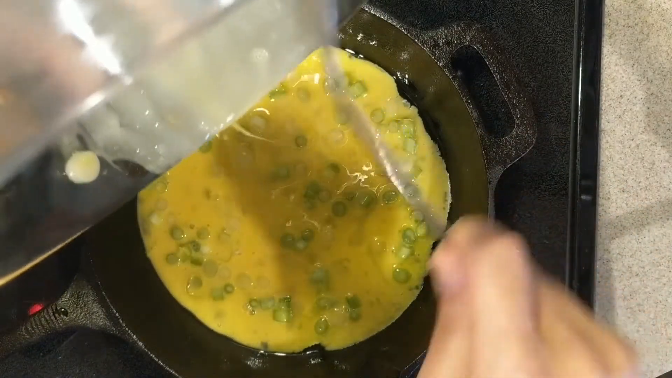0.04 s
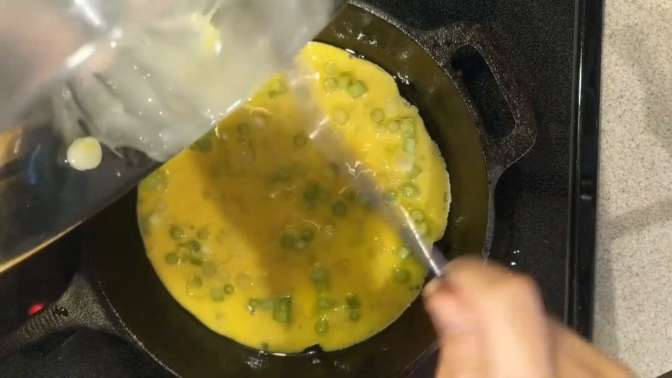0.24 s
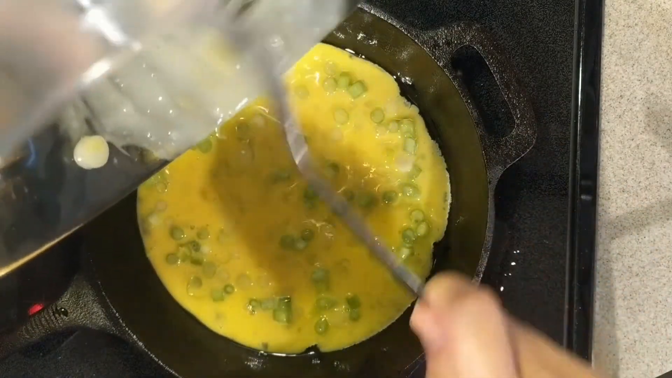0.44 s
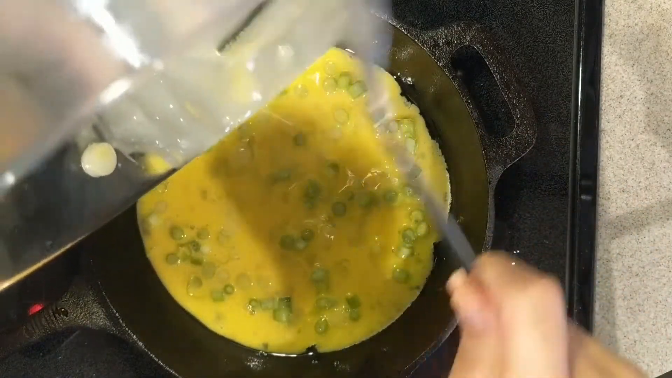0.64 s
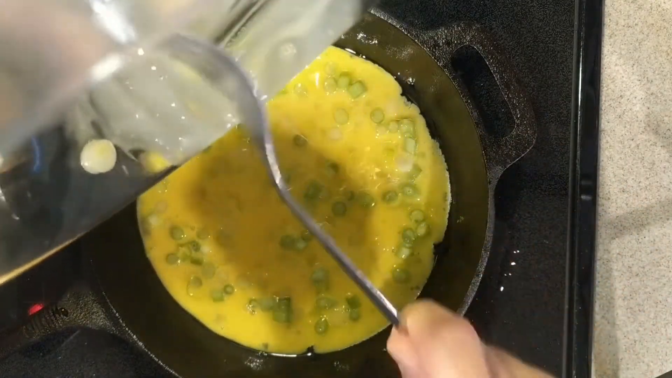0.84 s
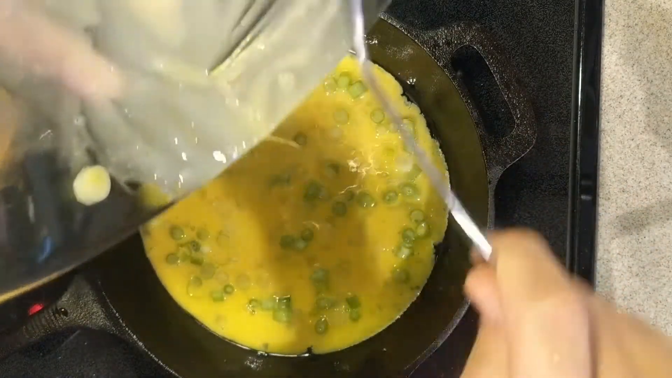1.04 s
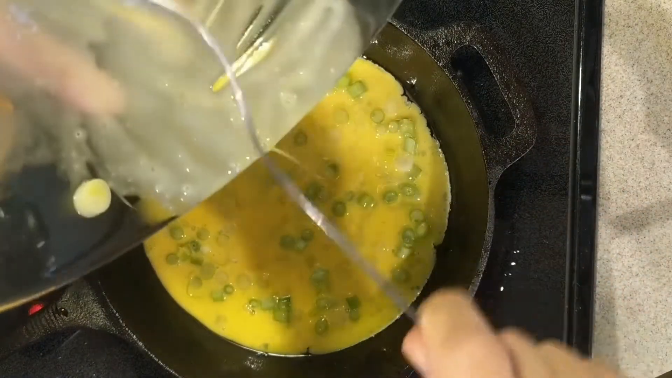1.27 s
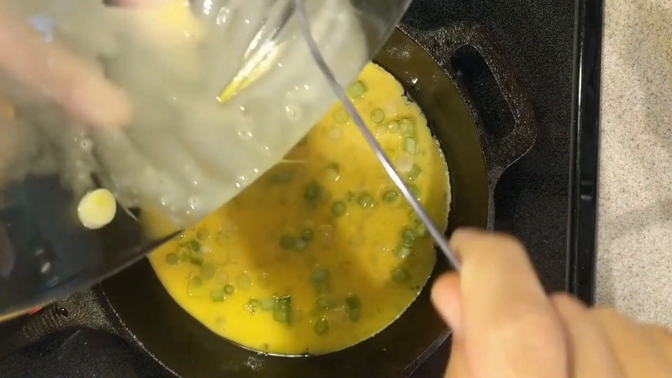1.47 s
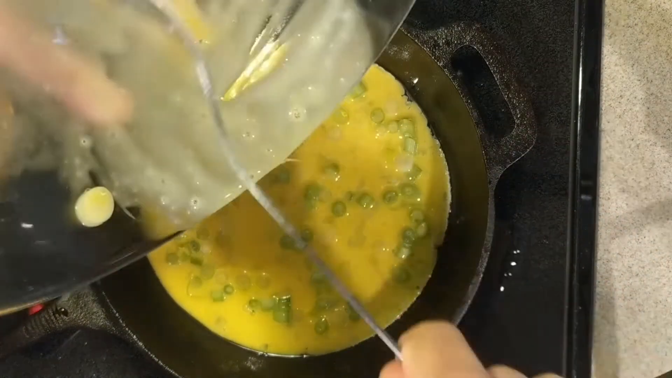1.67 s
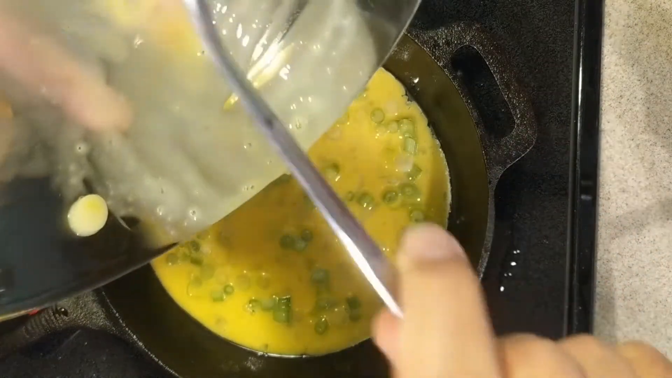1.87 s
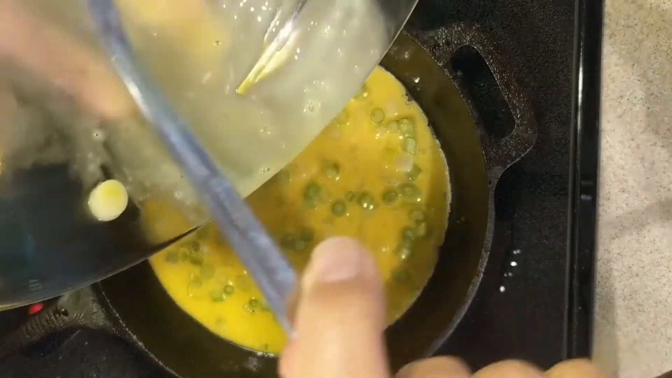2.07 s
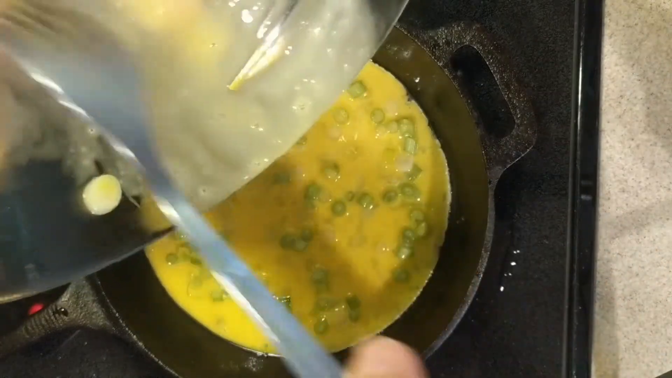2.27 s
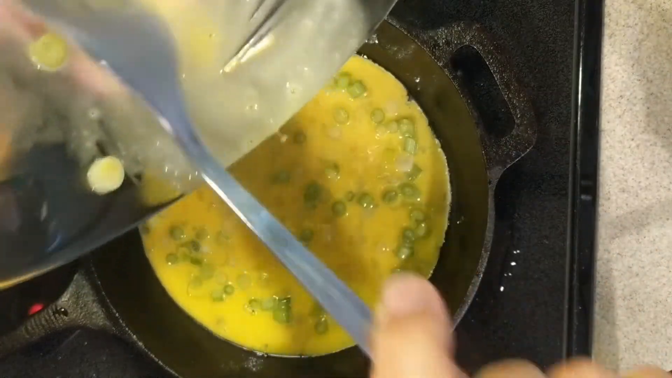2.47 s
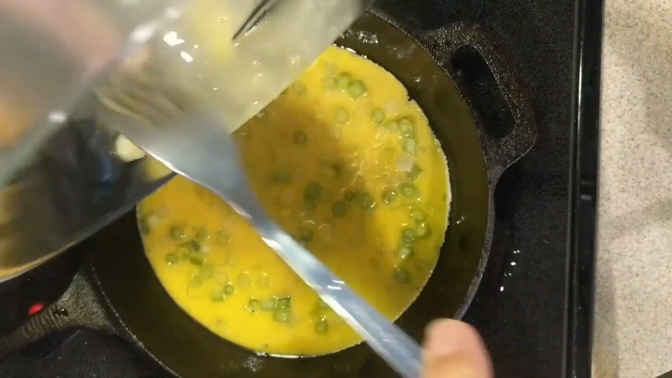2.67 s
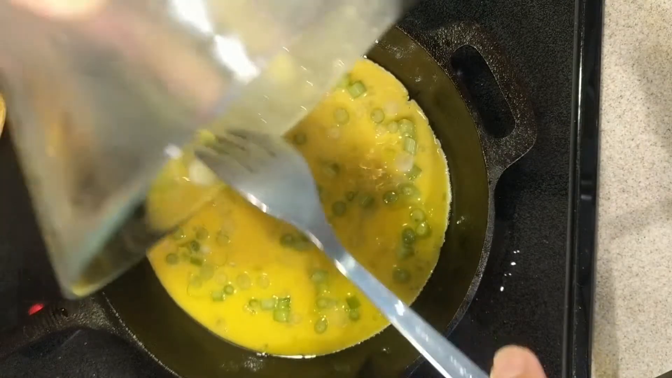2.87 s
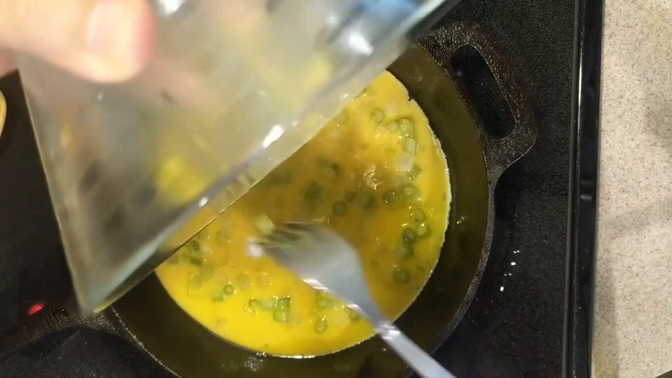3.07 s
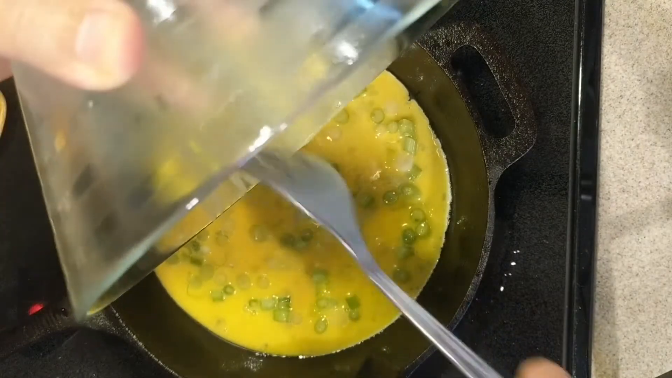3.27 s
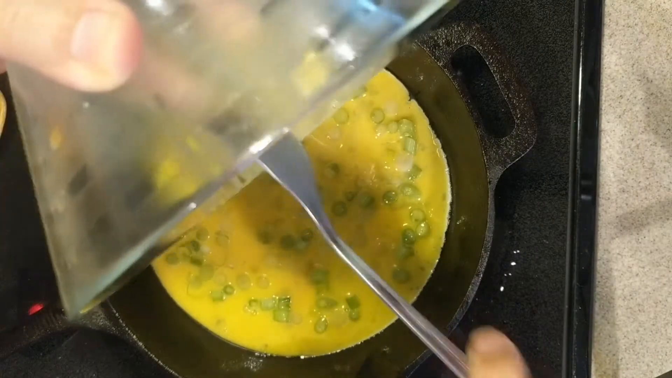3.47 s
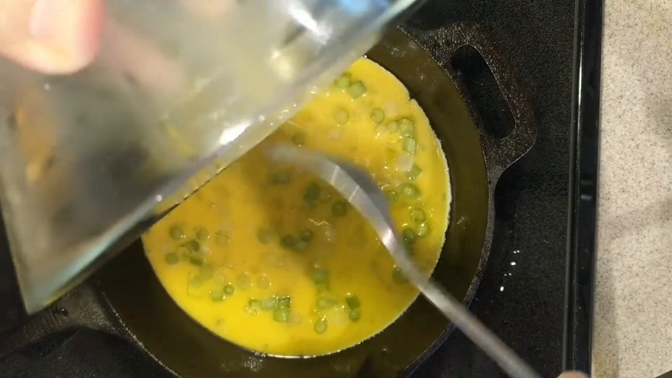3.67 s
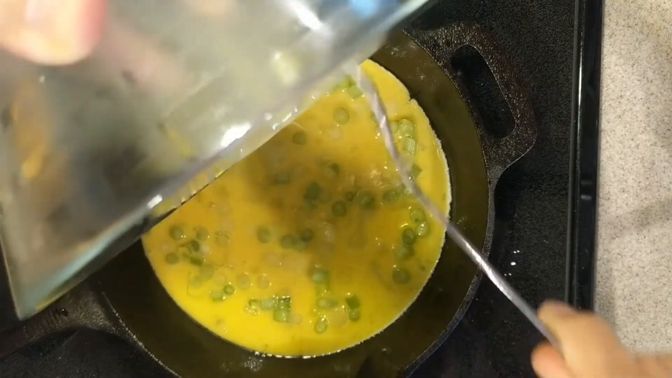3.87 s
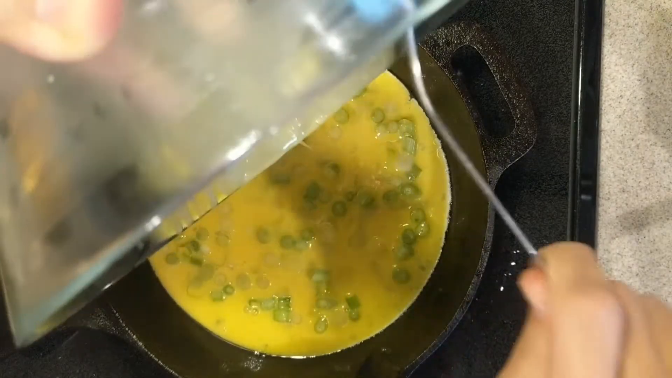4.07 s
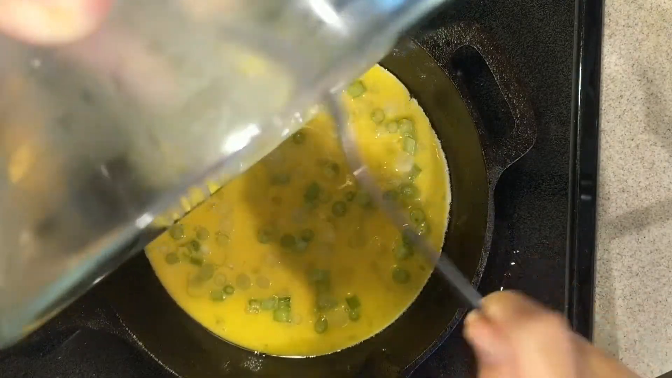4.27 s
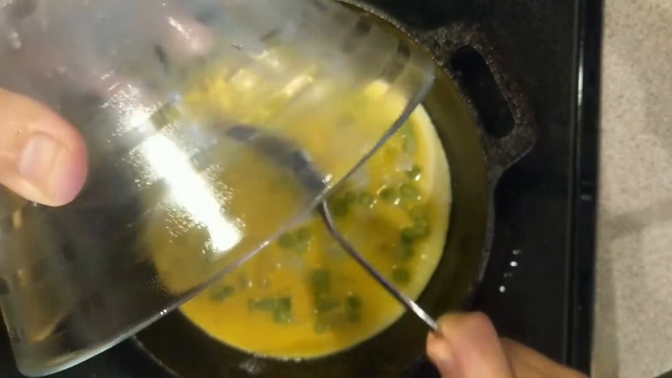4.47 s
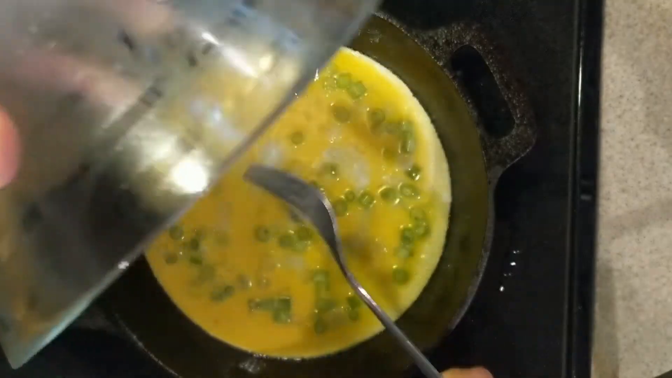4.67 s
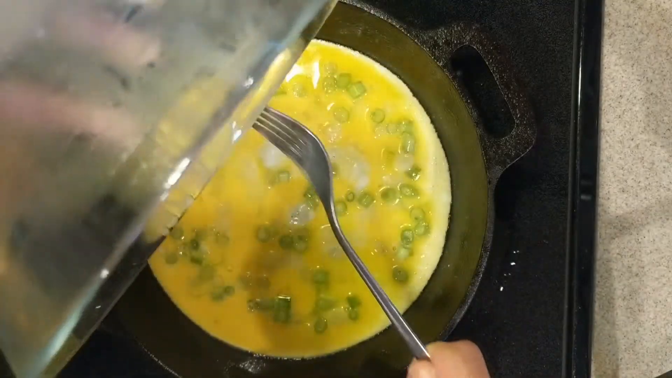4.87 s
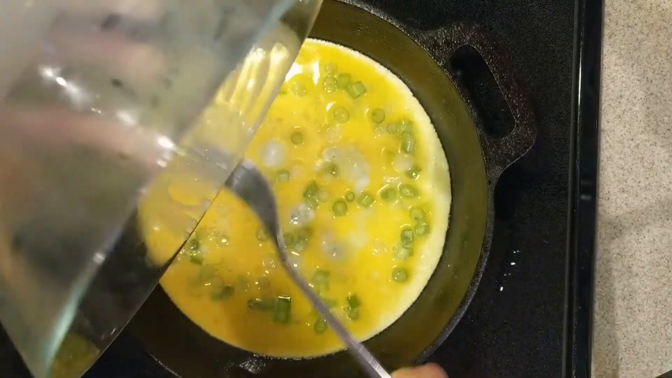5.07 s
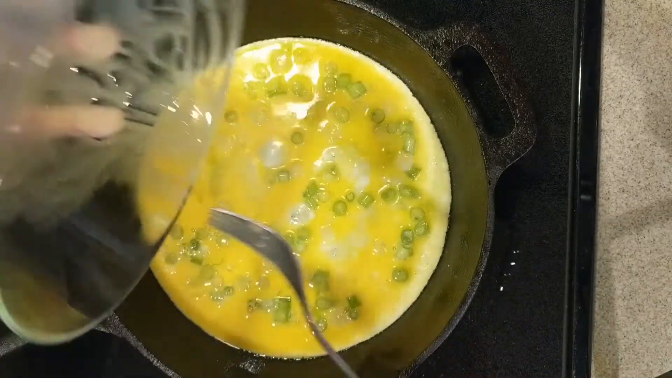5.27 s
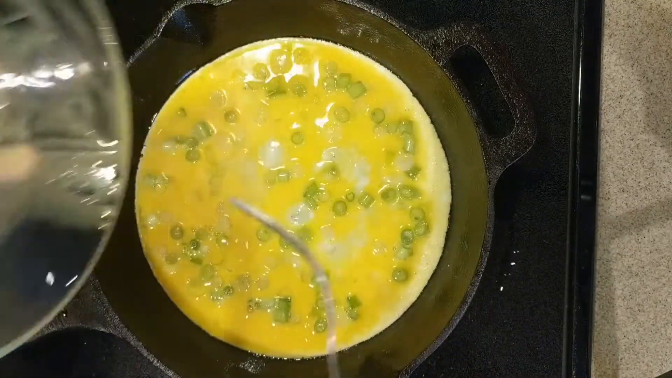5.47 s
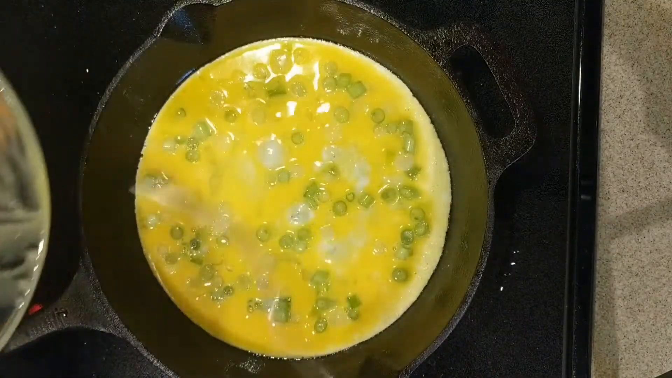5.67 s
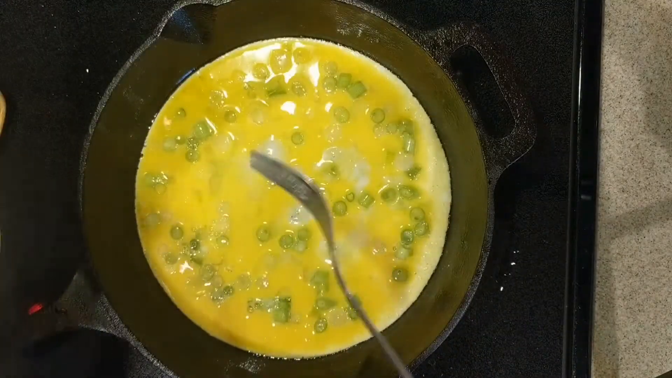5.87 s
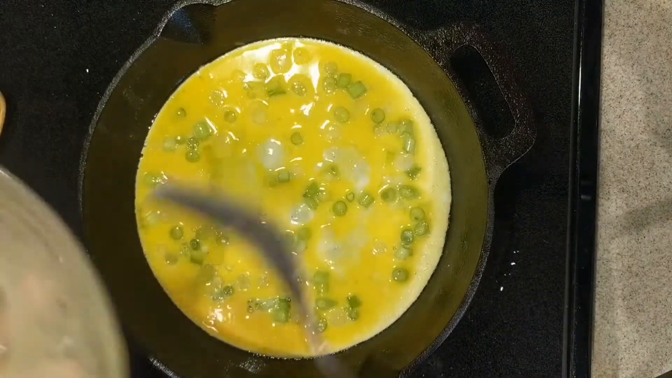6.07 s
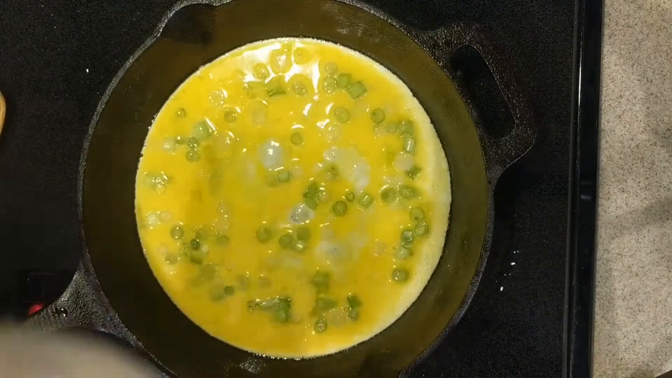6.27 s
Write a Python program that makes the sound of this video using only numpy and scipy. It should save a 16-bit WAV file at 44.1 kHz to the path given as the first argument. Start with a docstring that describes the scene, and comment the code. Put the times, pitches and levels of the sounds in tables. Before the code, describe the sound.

Irregular ringing clinks and brief wet squeaks of a fork on a glass bowl, over faintly frying egg in a small kitchen.

```python
"""A metal fork clinks on a glass bowl, scraping the last beaten egg into a hot skillet close by.
Each touch makes a short clack and sets the glass and the fork ringing. The tines (the fork's prongs)
stick and slip on the wet wall, which squeaks, and at the end they drag off the rim.
The egg bubbles softly in the pan and dies down once the pour ends.
A small kitchen adds short echoes, steady room noise with a faint sizzle, and an electric hum."""
import sys
import numpy as np
from scipy import signal
from scipy.fft import rfft, irfft
from scipy.io import wavfile

SR = 44100
rng = np.random.default_rng(int(sys.argv[2]) if len(sys.argv) > 2 else 0)


def unload_wav(signal):
    """Save mono or channel-first audio to the path in sys.argv[1] as 16-bit WAV at rate SR, clipped to [-1, 1]."""
    wavfile.write(
        sys.argv[1],
        SR,
        np.round(np.clip(np.atleast_2d(signal).T, -1, 1) * 32767).astype(np.int16),
    )


N = 279594
TIME = np.arange(N) / SR
RING_TIME = np.arange(SR * 3 // 5) / SR
TOP_HZ = 16100

# A mode is one tone an object rings at; ring_s is the time a sound takes to fade by 60 dB.
# Touches of the fork: start_s, force_db, wall (0 free rim, 1 inner wall), place (along the rim),
# knock_db, crisp_db (a film of egg dulls the clack), ring_factor (multiplies the modes' ring_s)
TOUCHES = [(-0.04, -44.5, 0.01, 0.086, -69, 0, 0.88), (0.155, -74, 0, -1.3, -80, -3, 0.45),
           (0.409, -28, 0.18, 0.89, -55.5, 1.5, 0.78), (0.7524, -29, 0.02, 1, -59.5, 2, 0.64),
           (1.1367, -36.5, 0.02, -0.38, -66, 6, 0.95), (1.3251, -61, .5, .6, -74, 2.5, 0.39),
           (1.341, -62, 0.75, 0, -75, -2, .7), (1.557, -61.5, 0.98, -0.43, -84, 10, 0.56),
           (1.577, -66, 0.75, -0.024, -82, 4, .7), (1.7122, -63, .8, 0.072, -83, 2, 0.38),
           (1.741, -61.5, 0.8, 0.12, -78, 4, 0.53), (2.0003, -42.5, 1, 0.65, -35.5, -13, 0.4),
           (2.0205, -44, 0.86, 0.14, -63, 5, 0.5), (2.127, -49.5, .9, 0.27, -51, 1, 0.46),
           (2.271, -68.5, 1, 0.41, -84.5, 11, .4), (2.5966, -31.5, 0.78, 0.047, -42, 1, 1.05),
           (2.665, -55.5, 0, -.2, -83, 0, 1), (3.075, -71.5, 0, -0.52, -85.5, -11, 1.7),
           (3.4844, -31, 0.11, -0.42, -39.5, -7.5, 1.56), (4.115, -32, 0.01, -.9, -61.5, 4.5, 1.15),
           (4.288, -67, .45, 0.56, -77.5, 0, .86), (4.434, -31.5, 0.14, -0.011, -55.5, 3.5, 1.05),
           (4.461, -43, 0.03, -.2, -77, 0, 0.44), (4.615, -63.5, 0.24, -0.9, -85.5, -10, 1.6),
           (5.0084, -30, 0.01, -1.1, -61, -11, 0.8), (5.179, -56.5, 0.4, -0.6, -68, -4, 1.1)]
# The bowl's six rim modes: pitch_hz
RIM_PITCHES = [796, 1705, 2781, 4065, 5592, 7368]
# Each is a close pair of tones, one damped by the holding hand: damped_ring_s, free_ring_s, split_hz
RIM_PAIRS = [(0.068, 0.29, 9.2), (0.075, 0.24, 6.4), (0.044, 0.25, 7), (0.091, 0.17, 5), (0.15, .17, 5),
             (0.051, 0.082, 88)]
# How much of a touch each rim mode gets: level_db, change_per_place_db
RIM_SHARES = [(-17.5, -5.5), (-13, 9.5), (-6, 2), (-5, -3), (-10, 7), (-4.5, -1)]
# The bowl's higher modes: pitch_hz, level_db, ring_s
HIGH_GLASS_MODES = [(4445, -5, 0.013), (4680, -6.5, 0.027), (5100, -10.5, 0.033), (5996, -16, 0.052),
                    (6716, -8, 0.098), (8350, -3, 0.039), (8690, -3, .06), (9763, -1, .1),
                    (11300, -16, 0.047), (11230, -10, .08), (11540, -20, 0.059), (13500, -19, .09),
                    (13905, -18.5, .07), (15050, -23, .05)]
# The wall's own short ping: pitch_hz, level_db, ring_s
WALL_MODES = [(4516, -2, 0.038), (4704, -3.5, 0.028)]
# The fork's stem bending: pitch_hz, level_db, ring_s
STEM_MODES = [(7970, -1, 0.16), (8257, -10, 0.075)]
# The tines ringing around their shared pitch: offset_hz, level_db, ring_s
TINE_MODES = [(-240, -0.5, .06), (-76.5, 7.5, 0.064), (30.5, 1.5, 0.031), (178, -2, .07)]
# The clack's knock, low, mid and top bands: centre_hz
CLACK_BANDS = [800, 2400, 5400, 11500]
# How much of a touch the low, mid and top bands get: level_db, change_per_place_db
CLACK_SHARES = [(-12.5, 4.5), (-12.5, -2), (-15, 3.5)]
# Tone colour of the clack, many short modes of glass and steel together: pitch_hz, level_db
CLACK_COLOUR = [(60, -25), (250, -13), (480, -6.5), (720, 3.5), (1100, 0.5), (1450, -3), (2000, 2.5),
                (3400, -4.5), (4600, -5.5), (6600, 0), (8500, -0.5), (10400, -1), (11500, 0), (12400, -14),
                (15200, -15.5), (16000, -29)]
# How long the clack lasts: pitch_hz, ring_s
CLACK_RING_TIMES = [(300, 0.086), (1000, 0.026), (2500, 0.028), (5000, 0.049), (9000, 0.042),
                    (15000, 0.059)]
# Tines slipping on wet glass: start_s, length_s, first_hz, last_hz, level_db, brightness_db
WET_SLIPS = [(1.311, 0.0248, 1950, 1620, -49, -3), (1.341, 0.046, 1320, 1270, -43.5, 6),
             (1.622, 0.07, 5500, 5700, -69.5, -20), (1.71, .024, 1910, 1590, -55.5, 6),
             (1.74, 0.023, 1290, 1100, -45.5, 12), (2.775, .085, 2500, 2150, -68, -20.5),
             (5.05, 0.19, 2200, 1730, -68, -3), (5.217, 0.015, 2000, 1950, -50, -14)]
# Strength of the drag, one row for the bowl and one for the fork: start_db, change_db
DRAG_LEVELS = [(-42.5, -8.5), (-49.5, 8)]
# Bowl modes that the drag rings: pitch_hz, level_db, ring_s
DRAG_BOWL_MODES = [(1744, -10, 0.33), (1890, -4.5, 0.0087), (2810, -3, 0.092), (4085, -7, 0.38),
                   (4160, -5.5, .02), (5610, -6.5, 0.24)]
# Fork modes that the drag rings: pitch_hz, level_db, ring_s
DRAG_FORK_MODES = [(6800, -7, 0.061), (7410, 0, 0.031), (8300, -21, 0.017), (9420, 2.5, 0.062),
                   (9530, -2, 0.096)]
# The drag's rasp in the four clack bands: level_db
RASP_LEVELS = [-3.5, -3, 7.5, -7]
# Wet plops of egg: start_s, relative_level_db, pitch_hz
EGG_PLOPS = [(0.945, -50, 926), (1.235, -46, 1030), (1.885, -56, 917), (2.11, -49, 923), (2.458, -52, 880),
             (3.199, -51, 910), (3.226, -47, 921), (3.945, -53.5, 886)]
# Tone colour the pan gives the bubbles: pitch_hz, level_db
PAN_COLOUR = [(200, -5.5), (600, -4.5), (790, -1), (910, 5), (1020, 1), (1200, -2), (2500, -2.5),
              (6000, -3)]
# How long the kitchen echoes: pitch_hz, ring_s
ROOM_RING_TIMES = [(200, 0.17), (1000, 0.27), (3000, 0.36), (6000, .3), (9500, .29), (12000, .2),
                   (16000, 0.27)]
# Tone colour of the room noise and fine sizzle: pitch_hz, level_db
AIR_COLOUR = [(15, -43.5), (28, -22), (42, -7), (60, 1), (100, -6.5), (170, -12), (350, -15), (750, -16),
              (1100, -22), (3000, -24), (7000, -31), (15000, -37)]
# Hum of the mains power: pitch_hz, level_db
HUM_TONES = [(59.3, -76.5), (118.6, -82.5)]


def fork_clinks(tine_hz=9260, rise_s=0.00075):
    """Each touch of steel on glass makes a clack and rings the modes of the bowl and the fork."""
    out = np.zeros(N)
    for start_s, force_db, wall, place, knock_db, crisp_db, ring_factor in TOUCHES:
        bands_db, rim_db, stem_db = touch_levels(force_db, wall, place, knock_db, crisp_db)
        tone = rim_ring(rim_db, ring_factor)
        tone += gain_of(bands_db[2]) * ring(HIGH_GLASS_MODES, ring_factor)  # follows the mid clack
        tone += gain_of(force_db - 23.5 + 18.5 * wall) * ring(WALL_MODES)
        tone += gain_of(stem_db) * ring(STEM_MODES, ring_factor)
        pressed_hz = tine_hz - 130 * place + 320 * wall  # tines ring higher when pressed on the wall
        tone += gain_of(force_db) * unit_start(ring(TINE_MODES, ring_factor, pressed_hz))
        clink = tone * (1 - np.exp(-RING_TIME / rise_s)) + clack(bands_db)
        add(out, start_s, kitchen_echo(clink))  # the bowl keeps moving, so each clink meets new echoes
    return out


def touch_levels(force_db, wall, place, knock_db, crisp_db, firm_db=-29.5):
    """Where and how hard the fork lands sets the dB of the clack bands, rim modes and fork stem."""
    wall_loss_db = -21 * wall  # the rim hardly rings when the wall is touched
    heavy_db = knock_db + 3.5  # a heavy knock also drives the low rim modes
    low_db, mid_db, top_db = (force_db + db + change * place for db, change in CLACK_SHARES)
    bands_db = [knock_db, max(low_db, heavy_db + wall_loss_db), mid_db + 5.5 * wall, top_db + crisp_db]
    light_db = .12 * (firm_db - force_db)  # a light touch favours the rim over the fork
    tapped_db = [force_db + light_db + db + change * place for db, change in RIM_SHARES]
    octaves_up = np.log2(np.divide(RIM_PITCHES, RIM_PITCHES[0]))
    rim_db = np.maximum(tapped_db, heavy_db - 4.5 * octaves_up) + wall_loss_db
    rim_db[0] += 8.5 * wall  # the lowest mode flexes the whole bowl, so a wall touch still reaches it
    stem_db = max(force_db - 22.5, knock_db - 11) + 8.5 * wall
    return bands_db, rim_db, stem_db


def rim_ring(levels_db, ring_factor, free_gain=0.57, sway_db=2):
    """The two tones of each rim pair start together, then drift in and out of step."""
    tone = 0
    phases = rng.random(len(RIM_PAIRS))
    for db, hz, (damped_s, free_s, split_hz), phase in zip(levels_db, RIM_PITCHES, RIM_PAIRS, phases):
        damped = mode(hz, damped_s * ring_factor, phase)
        free = free_gain * mode(hz + split_hz, free_s * ring_factor, phase)
        sway = gain_of(sway_db * wobble(len(RING_TIME), 4000))  # the bowl turns in the hand
        tone += gain_of(db) * unit_start(sway * (damped + free))
    return tone


def clack(bands_db, boost_db=10, rebound=0.26, bounce_s=0.0038):
    """The tines tick and bounce on the glass, over a burst of dense, short ringing."""
    burst = dying_noise(CLACK_RING_TIMES)
    tick = 0.4 * np.linalg.norm(burst)
    gaps_s = bounce_s * rng.uniform(0.45, 2, 4)
    for bounce, start_s in enumerate(np.cumsum(gaps_s) - gaps_s[0]):
        add(burst, start_s, np.array([tick * rebound ** bounce]))
    bands = list(zip(CLACK_BANDS, bands_db))
    shaped = coloured(unit_start(burst), lambda hz: look_up(CLACK_COLOUR, hz) + look_up(bands, hz))
    return gain_of(boost_db) * shaped


def fork_squeaks(edge_s=.002, fade_db=-7.5, flutter_db=3, peak_width_hz=330):
    """Tines stick and slip in a gliding tone; its overtones flare where the fork likes to ring."""
    out = np.zeros(N)
    for start_s, length_s, first_hz, last_hz, level_db, brightness_db in WET_SLIPS:
        t = np.arange(0, length_s, 1 / SR)
        hz = first_hz + (last_hz - first_hz) * (t / length_s) ** 2.5  # holds at first, then slides
        db = level_db + fade_db * t / length_s  # the tines lose grip
        jitter = np.interp(db, [-66, -54], [.035, .007])  # light contact slips less regularly
        hz *= 1 + jitter * wobble(len(t), 120)
        db += flutter_db * wobble(len(t), 300)  # the grip is uneven
        angle = 2 * np.pi * np.cumsum(hz) / SR
        multiples = np.arange(2, 13)[:, None]
        fork_peaks = sum(gain_of(peak_db) / (1 + ((multiples * hz - peak_hz) / peak_width_hz) ** 2)
                         for peak_hz, peak_db in [(6500, 0), (9200, -3), (11500, -12)])
        overtones = gain_of(brightness_db) * (gain_of(-24) + fork_peaks) * (multiples * hz < TOP_HZ)
        tone = np.sin(angle) + (overtones * np.sin(multiples * angle)).sum(0)
        tone /= np.sqrt((1 + (overtones ** 2).sum(0)) / 2)
        grip = np.minimum(t / edge_s, 1) * np.minimum((length_s - t) / edge_s, 1)
        add(out, start_s, grip * gain_of(db) * tone)
    # a squeak that glides through the second rim mode leaves it ringing
    bowl = mode(RIM_PITCHES[1], ring_s=.25)
    return out + gain_of(19) * signal.fftconvolve(out, bowl / abs(bowl).sum())[:N]


def rim_drag(start_s=5.233, length_s=0.058, slips_per_s=900, rasp_db=-10):
    """A quick run of uneven slips rings the bowl, then mostly the fork as it leaves the rim."""
    t = np.arange(0, length_s, 1 / SR)
    slips = unit_level(random_ticks(len(t), slips_per_s))
    out = np.zeros(N)
    for (start_db, change_db), modes in zip(DRAG_LEVELS, (DRAG_BOWL_MODES, DRAG_FORK_MODES)):
        one_slip = unit_energy(ring(modes)) + gain_of(rasp_db) * unit_energy(clack(RASP_LEVELS))
        strength = gain_of(start_db + change_db * t / length_s)
        add(out, start_s, signal.fftconvolve(slips * strength, one_slip))
    return out


def frying_egg(count=2200, centre_hz=1000, pour_end_s=4.2, settle_s=.6, plop_boost_db=6):
    """Many small bubbles, growing quieter once no more egg runs in, and a few larger plops."""
    bubbles = np.zeros(N)
    starts_s = rng.random(count) * N / SR
    pitches_hz = centre_hz * np.exp(.45 * rng.standard_normal(count))
    levels_db = 3 * np.minimum(rng.exponential(1, count), 3)
    for start_s, hz, db in zip(starts_s, pitches_hz, levels_db):
        add(bubbles, start_s, gain_of(db) * bubble(hz))
    pour_db = np.interp(TIME, [pour_end_s, pour_end_s + settle_s], [-69.5, -80])
    out = unit_level(coloured(bubbles, lambda hz: look_up(PAN_COLOUR, hz))) * gain_of(pour_db)
    for start_s, db, hz in EGG_PLOPS:
        add(out, start_s, gain_of(db + plop_boost_db) * bubble(hz))
    return out


def bubble(hz, ring_cycles=16, pop_gain=0.18):
    """A bubble in thick egg rings very briefly, with a noisy pop from its skin."""
    t = RING_TIME[:SR // 40]
    rise, fade = 1 - np.exp(-t * hz * 2), fade_out(t, ring_cycles / hz)
    pop = pop_gain * fade * rng.standard_normal(len(t))
    return rise * fade * (np.sin(2 * np.pi * hz * t) + pop)


def kitchen_echo(sound, early_db=-10, tail_db=-11, build_s=0.0063):
    """Adds early echoes off the stove and wall, and the short tail of the room."""
    tail = dying_noise(ROOM_RING_TIMES) * (1 - np.exp(-(RING_TIME / build_s) ** 2))
    early = random_ticks(len(RING_TIME), per_s=900) * fade_out(RING_TIME, ring_s=.08)
    echo = gain_of(tail_db) * unit_energy(tail) + gain_of(early_db) * unit_energy(early)
    return sound + signal.fftconvolve(sound, echo)[:len(sound)]


def room_noise(air_db=-67):
    """Steady room noise with a faint sizzle and the hum of the mains power."""
    colour = gain_of(look_up(AIR_COLOUR, np.fft.rfftfreq(N, 1 / SR)))
    air = irfft(rfft(rng.standard_normal(N)) * colour, N)
    hum = sum(gain_of(db) * unit_level(np.sin(2 * np.pi * (hz * TIME + rng.random())))
              for hz, db in HUM_TONES)
    return gain_of(air_db) * unit_level(air) + hum


def ring(modes, ring_factor=1, shift_hz=0):
    """Several modes struck together."""
    return sum(gain_of(db) * unit_start(mode(hz + shift_hz, ring_s * ring_factor, rng.random()))
               for hz, db, ring_s in modes)


def mode(hz, ring_s, phase_turns=0):
    """One pure tone dying away."""
    return np.sin(2 * np.pi * (hz * RING_TIME + phase_turns)) * fade_out(RING_TIME, ring_s)


def fade_out(t, ring_s):
    """A fade that falls 60 dB every ring_s."""
    return np.exp(-np.log(1000) * t / ring_s)


def dying_noise(ring_times):
    """Noise in which each band of pitch dies at its own speed."""
    hz, t, bands = signal.stft(rng.standard_normal(len(RING_TIME)), SR, nperseg=128)
    fades = gain_of(-60 * t / look_up(ring_times, hz)[:, None])
    return signal.istft(bands * fades, SR)[1][:len(RING_TIME)]


def random_ticks(count, per_s):
    """Ticks of random size at random moments."""
    return rng.standard_normal(count) * (rng.random(count) < per_s / SR)


def wobble(count, span):
    """A smooth random curve that changes about every span samples."""
    return unit_level(signal.fftconvolve(rng.standard_normal(count), signal.windows.hann(span), "same"))


def coloured(sound, db_at):
    """Turns each pitch up or down by db_at(hz), with no ringing ahead of the sound."""
    log_gain = np.log(gain_of(db_at(abs(np.fft.fftfreq(2048, 1 / SR)))))
    taps = np.fft.ifft(np.exp(np.conj(signal.hilbert(log_gain)))).real
    return signal.fftconvolve(sound, taps)[:len(sound)]


def look_up(table, hz):
    """Reads between the rows of a (pitch_hz, value) table on a musical pitch scale."""
    pitches_hz, values = np.transpose(table)
    return np.interp(np.log(hz + 1), np.log(pitches_hz + 1), values)


def add(mix, start_s, sound):
    """Mixes a sound in at start_s, cutting off what does not fit."""
    start = round(start_s * SR)
    sound = sound[max(-start, 0):]
    part = mix[max(start, 0):][:len(sound)]
    part += sound[:len(part)]


def gain_of(db):
    """Turns decibels into a multiplier."""
    return 10 ** (np.asarray(db) / 20)


def unit_level(x):
    """Scales to an average (rms) level of 1."""
    return x / np.sqrt(np.mean(x ** 2) + 1e-20)


def unit_start(x):
    """Scales so the first 50 ms have an average (rms) level of 1."""
    return x / np.sqrt(np.mean(x[:SR // 20] ** 2) + 1e-20)


def unit_energy(x):
    """Scales to a total energy of 1."""
    return x / np.linalg.norm(x)


def scene():
    """Fork, bowl and pan in the kitchen, as one channel."""
    return (fork_clinks() + kitchen_echo(fork_squeaks() + rim_drag() + frying_egg()) + room_noise())[None]


def record(dry):
    """Cuts the treble above TOP_HZ."""
    low_pass = signal.firwin(255, TOP_HZ, window=("kaiser", 9), fs=SR)
    return signal.oaconvolve(dry, low_pass[None], "same")


dry = scene()
out = record(dry)
unload_wav(out)
```